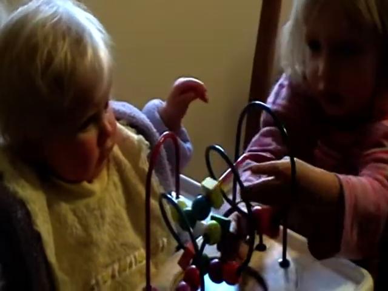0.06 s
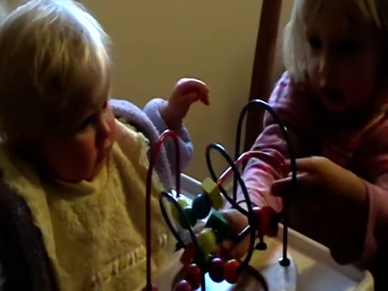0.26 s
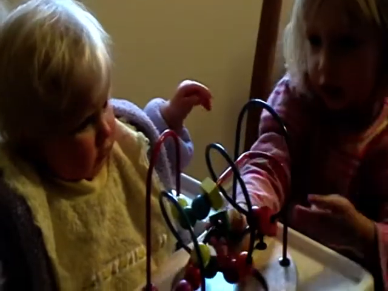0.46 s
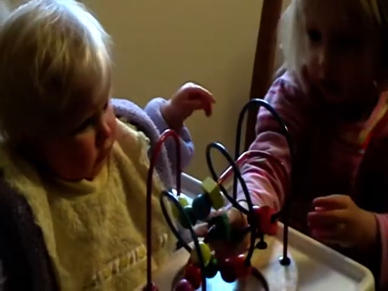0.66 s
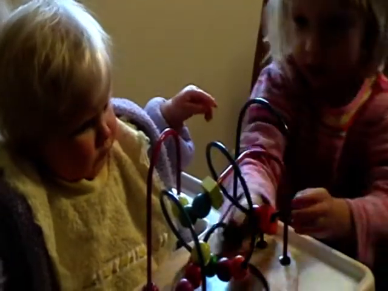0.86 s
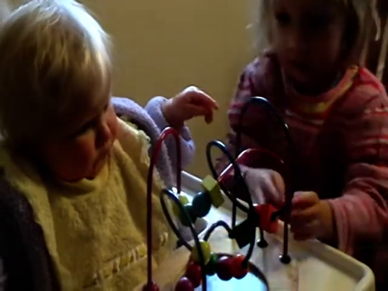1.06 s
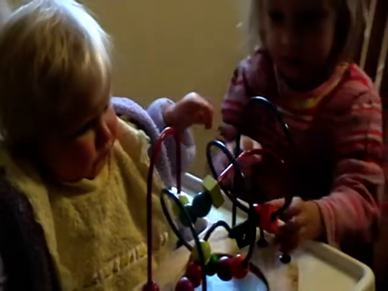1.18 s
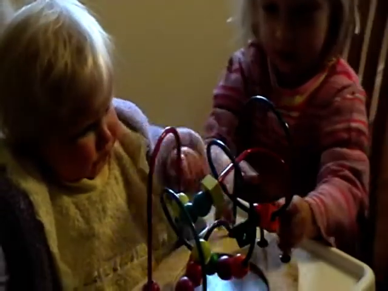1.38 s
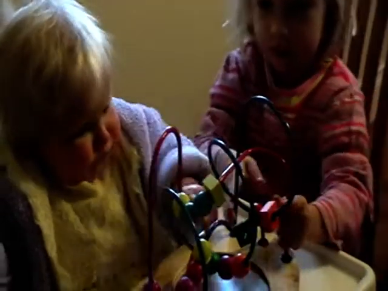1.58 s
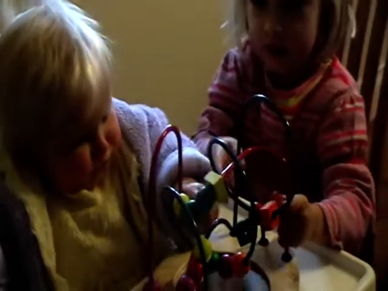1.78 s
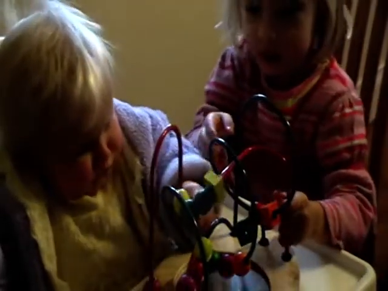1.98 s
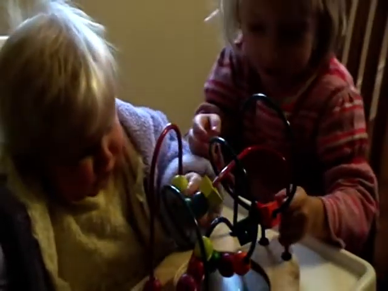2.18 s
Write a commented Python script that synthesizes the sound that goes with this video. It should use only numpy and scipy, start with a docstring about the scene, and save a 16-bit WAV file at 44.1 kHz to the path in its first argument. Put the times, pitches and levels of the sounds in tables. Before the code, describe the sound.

Wooden beads slide down a wire toy, squeak faintly and clack together in a quick flurry, then a shorter one. A sleeve brushes past and a plastic tray is bumped once, close to the microphone in a small, quiet room.

```python
"""Small room, a bead maze on a plastic tray close to the microphone.
Wooden beads slide down the wires, squeak faintly and clack against each other and the toy's base
in two short flurries. Each clack rings modes of bead, base and wire; the room rings after them.
Fingers touch the beads, a sleeve brushes past, the tray is bumped once.
A thin whine sits in the quiet room noise."""
import sys
import numpy as np
from scipy import signal
from scipy.fft import rfft, irfft
from scipy.io import wavfile
from scipy.ndimage import uniform_filter1d

SR = 44100
rng = np.random.default_rng(int(sys.argv[2]) if len(sys.argv) > 2 else 0)


def file_out(sig):
    """Save sig as 16-bit WAV at sys.argv[1]."""
    # one column per channel
    cols = np.atleast_2d(sig).T
    # limit, then scale
    lim = np.clip(cols, -1, 1)
    pcm = np.round(lim * 32767).astype(np.int16)
    wavfile.write(sys.argv[1], SR, pcm)


N = 99225
CONTACT_S = 0.00038  # rise time of every impact


def undb(db):
    """Decibels to gain."""
    return 10 ** (np.asarray(db) / 20)


def over_hz(points, hz):
    """Interpolate (f/Hz, value) points on a log-frequency axis."""
    p = np.array(points, float)
    return np.interp(np.log(np.maximum(hz, 1)), np.log(p[:, 0]), p[:, 1])


def noise(colour):
    """Unit-rms noise with the given spectral shape."""
    gain = undb(over_hz(colour, np.fft.rfftfreq(N, 1 / SR)))
    y = irfft(rfft(rng.standard_normal(N)) * gain, N)
    return y / y.std()


def walk(rate_hz):
    """Smooth random drift, unit spread."""
    width = int(SR / rate_hz)
    y = uniform_filter1d(rng.standard_normal(N), width, mode="wrap")
    y = uniform_filter1d(y, width, mode="wrap")
    return y / y.std()


def swell(at_s, half_s):
    """Gaussian rise and fall."""
    return np.exp(-((np.arange(N) / SR - at_s) / half_s) ** 2)


def add(track, sound, at_s):
    """Mix a sound in at a given time."""
    i = max(int(at_s * SR), 0)
    track[i:] += sound[:N - i]


def ring(modes, pitch=1):
    """Decaying modes after one short contact; neighbours swing in opposite directions."""
    t = np.arange(N // 8) / SR
    y = sum((-1) ** k * undb(db) * np.sin(2 * np.pi * hz * pitch * t) * np.exp(-np.log(1000) * t / t60_s)
            for k, (hz, db, t60_s) in enumerate(modes))
    attack = 1 - np.exp(-(t / CONTACT_S) ** 2)
    return np.pad(y * attack, (0, N - len(t)))


def burst(source, decay_s):
    """Random slice of a noise, dying quickly."""
    t = np.arange(N // 16) / SR
    start = rng.integers(N - len(t))
    attack = 1 - np.exp(-(t / CONTACT_S) ** 2)
    y = source[start:start + len(t)] * np.exp(-t / decay_s) * attack
    return np.pad(y, (0, N - len(t)))


def room(x):
    """Direct sound, early reflections off tray and near wall, diffuse tail weak in the treble."""
    decay = [(200, .6), (1400, 0.8), (3000, 0.63), (4500, 0.53), (9000, 0.8)]  # tail decay: f/Hz, t60/s
    reverb_level = [(200, -11.5), (1400, 0), (3000, -3), (3600, -9.5), (4500, -6.5), (6000, -4),
                    (9000, -12), (15000, -14)]  # reverb re direct sound: f/Hz, level/dB
    gap_s, early_s, early_db = 0.007, 0.01, -3
    t, hz = np.arange(N) / SR, np.fft.rfftfreq(N, 1 / SR)
    white = rfft(rng.standard_normal(N))
    centres_hz, t60s_s = np.array(decay).T
    bands = [irfft(white * over_hz(np.c_[centres_hz, share], hz), N) for share in np.eye(len(decay))]
    tail = sum(band * np.exp(-np.log(1000) * t / t60_s) for band, t60_s in zip(bands, t60s_s))
    early = rng.standard_normal(N) * np.exp(-t / early_s)
    echoes = rfft(tail / np.linalg.norm(tail) + undb(early_db) * early / np.linalg.norm(early))
    flattened = echoes / np.sqrt(uniform_filter1d(np.abs(echoes) ** 2, size=128))
    response = np.zeros(N)
    add(response, irfft(flattened * undb(over_hz(reverb_level, hz)), N), gap_s)
    return x + signal.fftconvolve(x, response[:N // 2])[:N]


def background():
    """Steady room noise, nearly the same at both microphone ports."""
    air_colour = [(28, -49.5), (40, -25), (62, -31.5), (95, -9.5), (120, -10), (147, -3.5), (195, -2.5),
                  (250, -5), (320, -2), (430, -7), (520, -16.5), (620, -9), (1400, -17.5), (1900, -15.5),
                  (3300, -14.5), (3850, -9.5), (4600, -25), (6300, -35), (9000, -37), (16000, -57)]  # noise spectrum: f/Hz, level/dB
    common_db, apart_db = -47, -12.5
    common = noise(air_colour)
    apart = np.array([noise(air_colour), noise(air_colour)])
    return undb(common_db) * (common + undb(apart_db) * apart)


def whine():
    """Faint high tone; a weaker one just below makes it throb."""
    tone_hz, wander_hz, tone_db, flicker_db = 3917, 2, -55, 1
    beat_hz, beat_spread_hz, beat_depth = 11, 1.2, 0.6
    phase = 2 * np.pi * np.cumsum(tone_hz + wander_hz * walk(25)) / SR
    beat = 2 * np.pi * np.cumsum(beat_hz + beat_spread_hz * walk(8.7)) / SR
    amplitude = np.sqrt(2) * undb(tone_db + flicker_db * walk(33))
    return amplitude * (np.sin(phase) + beat_depth * np.sin(phase - beat))


def sleeve():
    """Cloth rubs and swishes in soft swells; near the microphone it adds hiss and rumble."""
    # strokes: t/s, half length/s, rub/dB, hiss and rumble/dB, swish/dB
    brushes = [(0.594, .05, -49, -67, -78), (0.716, 0.16, -48.5, -64.5, -73.5),
               (1.14, .05, -55.5, -85, -68), (1.646, 0.052, -49, -73, -69), (1.91, 0.067, -55, -70.5, -80),
               (2.23, 0.16, -51.5, -85, -59)]
    # cloth noise spectra: f/Hz, level/dB
    rub_colour = [(500, -11.5), (2000, -18), (3500, 5), (4500, -6.5), (6500, -21), (8500, -22),
                  (16000, -47.5)]
    swish_colour = [(1000, -29), (4000, -5.5), (5500, -1), (7000, -3), (8500, -23.5), (16000, -35)]
    rumble_colour = [(30, -32), (65, -4.5), (110, 2), (250, -22.5), (1000, -70.5)]
    flicker_db, rumble_over_hiss_db = 1.9, 1.5
    rub = noise(rub_colour) * undb(flicker_db * walk(50))
    swish = noise(swish_colour)
    close = rng.standard_normal((2, N)) + undb(rumble_over_hiss_db) * noise(rumble_colour)
    return sum(swell(at_s, half_s) * (undb(rub_db) * rub + undb(close_db) * close + undb(swish_db) * swish)
               for at_s, half_s, rub_db, close_db, swish_db in brushes)


def tray_bump():
    """One dull bump rings the plastic tray's low modes."""
    tray_modes = [(177, -5, 0.11), (340, -3.5, .06), (480, -6.5, 0.044), (592, 1.5, 0.099)]  # f/Hz, level/dB, t60/s
    bump_db = -38.5
    out = np.zeros(N)
    add(out, undb(bump_db) * ring(tray_modes), at_s=1.129)
    return out


def squeak():
    """A sliding bead makes its wire sing faintly."""
    slides = [(0.09, 0.029, -46.5), (.15, .018, -45.5)]  # swells: t/s, half length/s, level/dB
    tone_hz, wander_hz = 1855, 17
    tone = np.sin(2 * np.pi * np.cumsum(tone_hz + wander_hz * walk(150)) / SR)
    return tone * sum(undb(db) * swell(at_s, half_s) for at_s, half_s, db in slides)


def finger_touches():
    """Fingers tap the beads lightly: a soft ring and a noisy knock."""
    touches = [(.003, -29, -42, .935), (.011, -31, -40.5, .935), (.018, -34, -41.5, .935),
               (0.5821, -44, -39, 1.05), (1.632, -44.5, -46, 0.95), (1.7175, -46, -32.5, .97),
               (1.727, -49, -38, 1.07)]  # t/s, bead ring/dB, knock/dB, pitch ratio
    bead_modes = [(1492, -10.5, 0.12), (2998, 3, 0.049), (3500, -11, 0.044), (4110, -3.5, 0.023)]  # touched bead: f/Hz, level/dB, t60/s
    knock_colour = [(200, -15), (1000, -16), (1400, -3), (3000, -1), (4400, -3.5), (5000, -23.5),
                    (7000, -43.5), (16000, -59.5)]  # contact noise: f/Hz, level/dB
    out, knock = np.zeros(N), noise(knock_colour)
    for at_s, bead_db, knock_db, pitch in touches:
        body = undb(bead_db) * ring(bead_modes, pitch)
        add(out, body + undb(knock_db) * burst(knock, decay_s=0.0054), at_s)
    return out


def bead_clacks():
    """Each clack rings bead, base and wire in its own proportion, with a crack and a sharp tick."""
    # impacts: t/s, bead/dB, base/dB, wire/dB, tick/dB, pitch ratio of bead and base
    clacks = [(0.2035, -21.5, -37, -34.5, -47, 1.024), (.2150, -23, -27, -42, -49.5, 0.89),
              (.2255, -22, -43, -26, -51, 1.06), (.2458, -8.5, -39, -27, -42.5, 1),
              (.2518, -16.5, -46.5, -22, -13, 1.005), (0.2735, -21, -32, -21.5, -53.5, 1.005),
              (.2805, -26.5, -36, -29.5, -60.5, 1.005), (0.3162, -16.5, -10.5, -35.5, -15.5, 1.01),
              (.3245, -16, -19.5, -17.5, -31, 1.01), (.3320, -22, -31, -15, -50, 1.1),
              (.3790, -17.5, -31, -27.5, -54, 1), (.3940, -20, -45.5, -27, -61, 1),
              (0.8878, -19.5, -9.5, -40, -36, 1), (0.8969, -35.5, -22.5, -27.5, -47, 1.056),
              (.9522, -15.5, -48, -31.5, -65, 0.98), (.9642, -14, -35, -25.5, -62, 0.99)]
    # modes: f/Hz, level/dB, t60/s
    bead_modes = [(1970, -26.5, 0.056), (2987, -7.5, 0.069), (3394, -7.5, 0.024), (3549, -1, 0.039),
                  (3650, -14, 0.039), (3843, -11, 0.037), (4370, -12.5, 0.026)]
    base_modes = [(706, -33.5, 0.091), (1005, -32, 0.036), (1239, -22, 0.075), (1350, -23, 0.053),
                  (1934, -14, 0.061), (2640, -11, 0.056), (2920, -2, 0.024), (2993, -5, 0.038),
                  (3516, -2, 0.028), (4366, -0.5, 0.027), (4546, -5, 0.021), (4700, -12.5, 0.021)]
    wire_modes = [(714, -22.5, 0.13), (1258, -16.5, 0.079), (1374.6, -8.5, 0.061), (1457, -4.5, 0.085),
                  (1986, -27.5, 0.041)]
    # contact noise spectra: f/Hz, level/dB
    crack_colour = [(150, -26.5), (700, -10), (1500, -18.5), (2300, -7.5), (3200, -3.5), (4400, -12),
                    (5200, -15.5), (6200, -21.5), (7000, -33.5), (10000, -57), (16000, -60)]
    tick_colour = [(1000, -25), (3800, 1.5), (5800, -1.5), (7000, -9.5), (8400, -16), (9400, -11.5),
                   (12000, -26.5), (16000, -38.5)]
    crack_re_force_db = -20.5
    out, crack_noise, tick_noise = np.zeros(N), noise(crack_colour), noise(tick_colour)
    for at_s, bead_db, base_db, wire_db, tick_db, pitch in clacks:
        bead = undb(bead_db) * ring(bead_modes, pitch)
        base = undb(base_db) * ring(base_modes, pitch)
        wire = undb(wire_db) * ring(wire_modes)
        force = np.hypot(undb(bead_db), undb(base_db))
        crack = force * undb(crack_re_force_db) * burst(crack_noise, decay_s=0.0047)
        tick = undb(tick_db) * burst(tick_noise, decay_s=0.00077)
        add(out, bead + base + wire + crack + tick, at_s)
    return out


def scene():
    """Toy and tray through the room; noise, whine and cloth added dry."""
    toy = bead_clacks() + finger_touches() + squeak() + tray_bump()
    return room(toy) + background() + whine() + sleeve()


def record(dry):
    """Two close ports differ in level and phase, add their own hiss and cut the top treble."""
    port_level = [(60, -5), (300, -3.5), (1450, -2), (2400, -0.8), (4400, 1.5), (8000, -3.5), (15000, -4)]  # left minus right: f/Hz, level/dB
    port_phase = [(100, 0.5), (430, 0.43), (1400, 0.42), (3000, 0.4), (4200, -1.13), (5000, -0.94),
                  (7700, -2.5), (11000, -2.1), (15000, -.5)]  # left lead: f/Hz, phase/rad
    hiss_db, top_hz = -73.5, 16000
    hz = np.fft.rfftfreq(N, 1 / SR)
    side = np.array([[1], [-1]]) / 2
    ports = undb(side * over_hz(port_level, hz)) * np.exp(1j * side * over_hz(port_phase, hz))
    y = irfft(rfft(dry) * ports, N) + undb(hiss_db) * rng.standard_normal((2, N))
    lowpass = signal.ellip(10, 0.2, 70, top_hz, fs=SR, output="sos")
    return signal.sosfilt(lowpass, y)


dry = scene()
out = record(dry)
file_out(out)
```